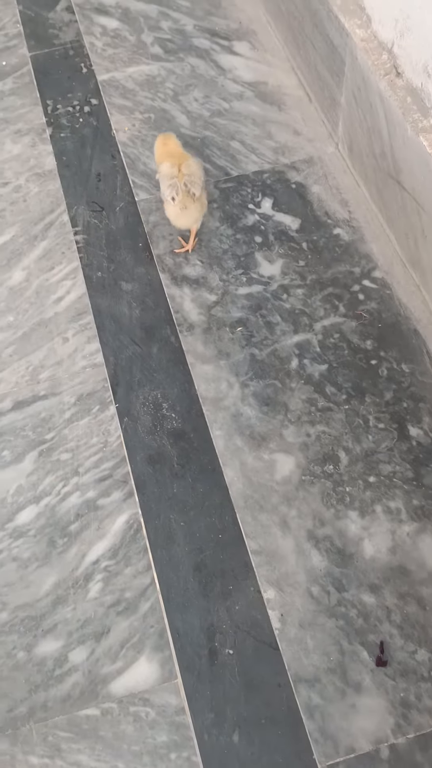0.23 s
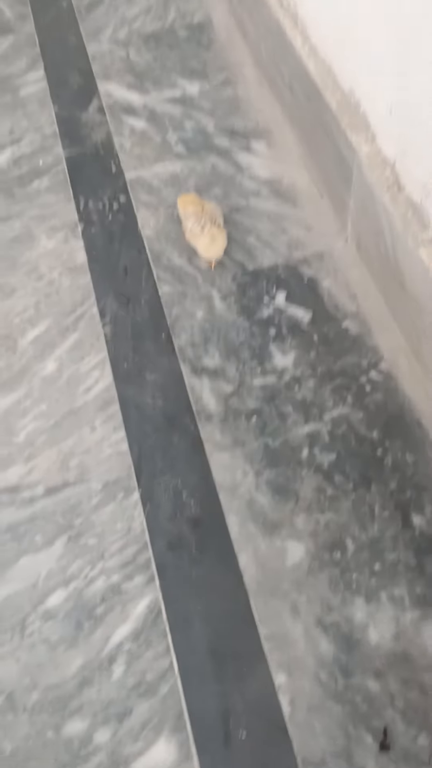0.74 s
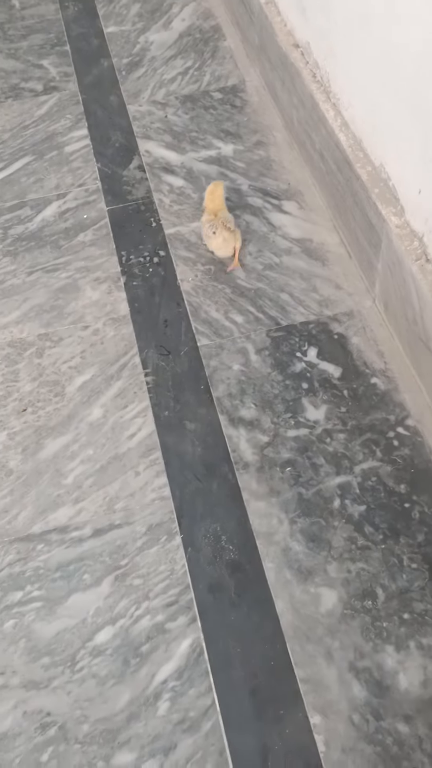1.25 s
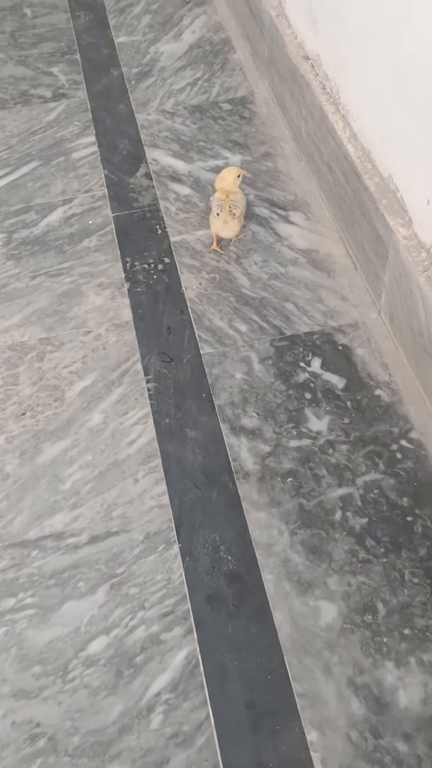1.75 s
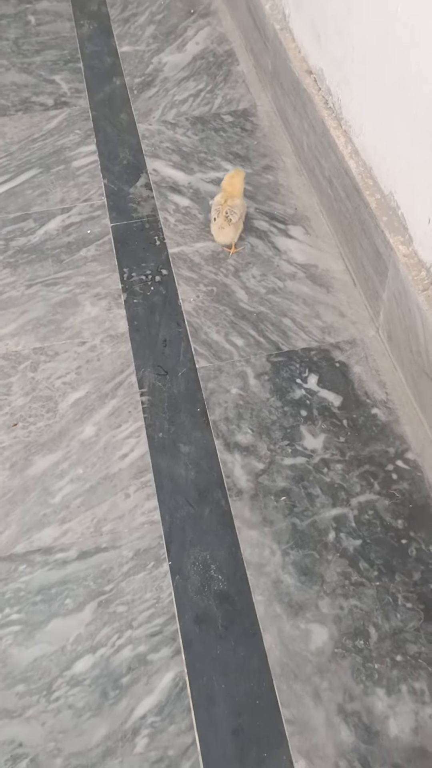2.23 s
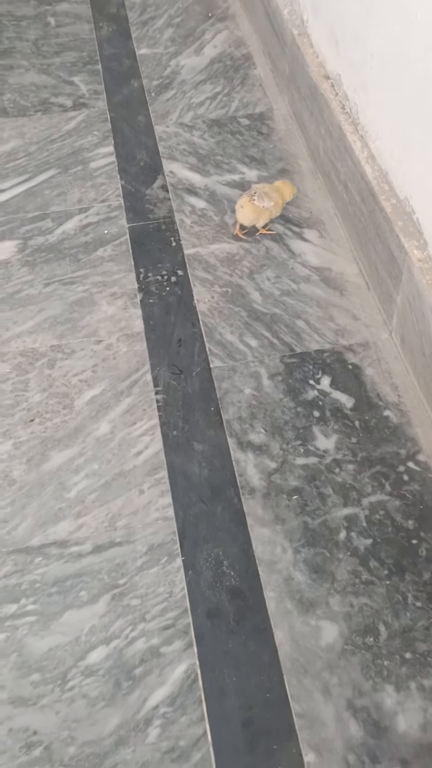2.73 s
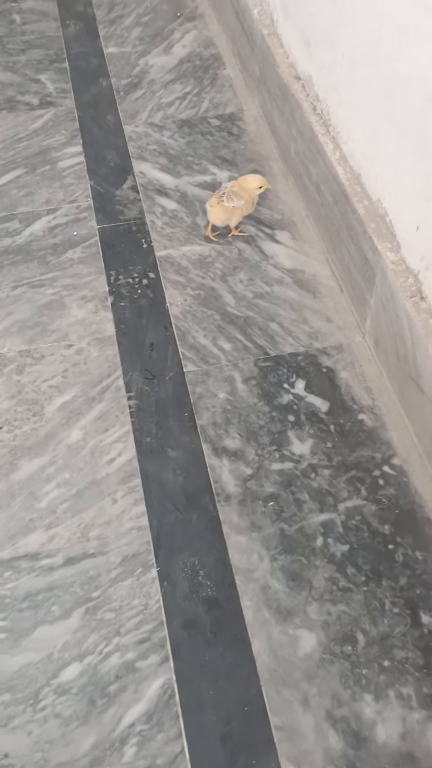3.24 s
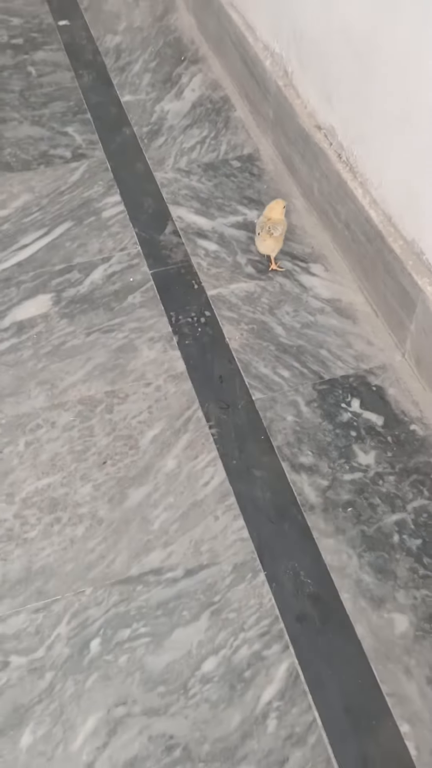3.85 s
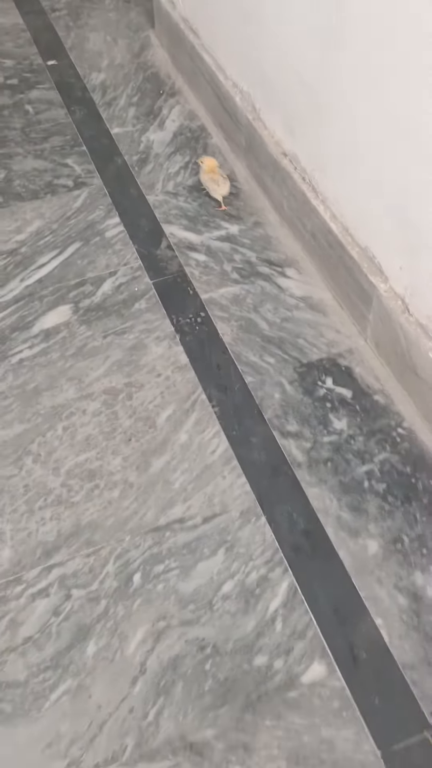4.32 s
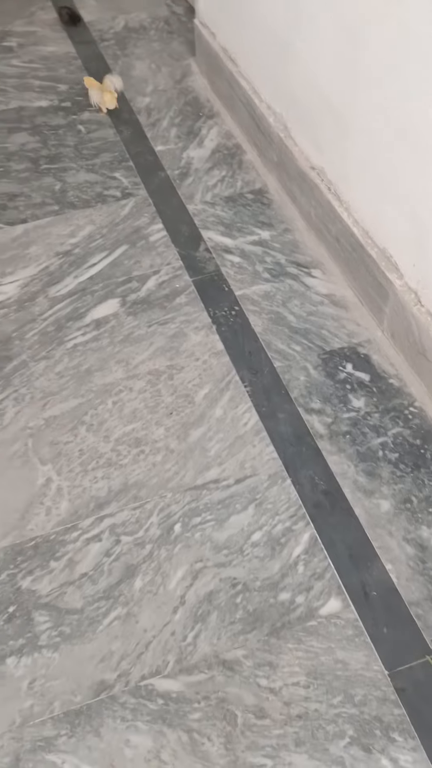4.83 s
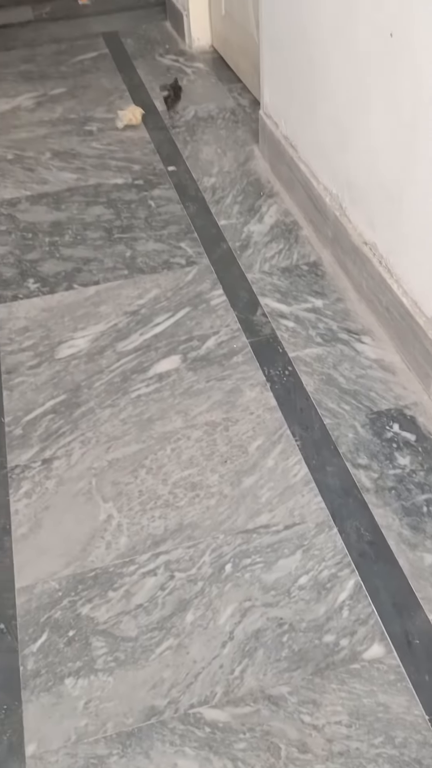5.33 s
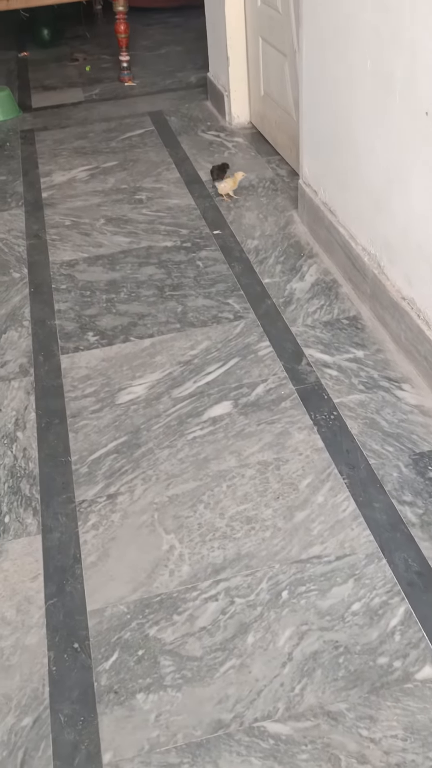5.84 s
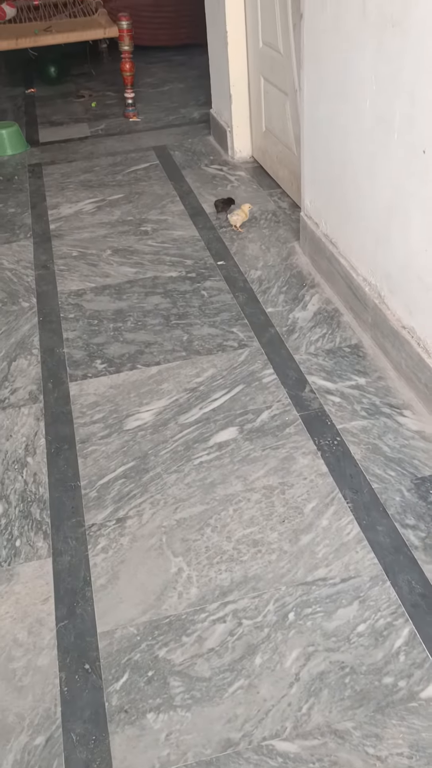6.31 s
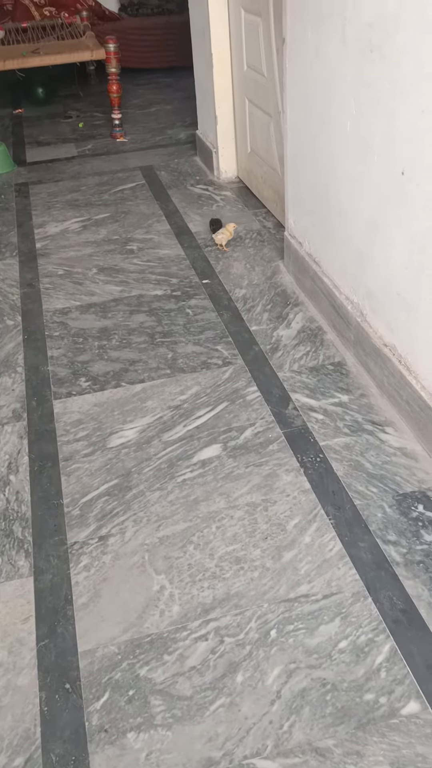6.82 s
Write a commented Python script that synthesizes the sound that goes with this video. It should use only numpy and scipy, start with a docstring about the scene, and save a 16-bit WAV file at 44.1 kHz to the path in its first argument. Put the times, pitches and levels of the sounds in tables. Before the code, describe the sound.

In a bare marble corridor, a chick gives tiny, faint, gliding whistle-like peeps, clustered around the middle. A follower's loose sandals clap sharply near the start, again before three seconds, then more softly, with gritty crunches, scuffs and dull thumps. Two light taps follow. A handheld phone adds low rumble, and the hard walls ring for about a second.

```python
"""A chick peeps softly as it runs down a marble corridor, followed by someone holding a phone.
Each peep is a gliding, trembling whistle. Loose sandals crunch on grit, clap flat and pop the air under them.
Soles and clothes rub as runs of tiny slips; heels and the hand on the phone give dull, low thumps.
The bare walls ring for about a second, over a low, steady background and the rumble of the carried phone."""
import sys
import numpy as np
from scipy import signal
from scipy.fft import rfft, irfft, next_fast_len
from scipy.io import wavfile
from scipy.ndimage import uniform_filter1d, map_coordinates

SR = 44100
rng = np.random.default_rng(int(sys.argv[2]) if len(sys.argv) > 2 else 0)


def digitize_waveform(pressure):
    """Quantize a signal to 16-bit integers and store it at the path in sys.argv[1].

    Rows of a 2-D input are taken as channels; values are limited to [-1, 1].
    """
    field = np.atleast_2d(pressure).T
    bounded = np.clip(field, -1, 1)
    quanta = np.round(bounded * 32767).astype(np.int16)
    wavfile.write(sys.argv[1], SR, quanta)


N = 312095
T = np.arange(N) / SR  # time of every sample in seconds

# Colour of the steady background. Each row: frequency in Hz, relative level in dB per Hz.
BACKGROUND_COLOUR = [(20, -4), (42, -3.5), (90, -4.5), (140, -4), (230, -10), (320, -10), (470, -16),
                     (750, -20), (1050, -23.5), (2400, -28), (3500, -31), (4800, -42), (6500, -40.5),
                     (10000, -47), (15500, -47.5)]
# Swells of the carried phone's rumble. Each row: time in seconds, level in dB before the overall rumble gain.
RUMBLE_LEVELS = [(0.0, -52.5), (0.79, -60.5), (1.06, -52), (1.48, -57), (1.93, -53.5), (3.01, -50),
                 (4.06, -56), (4.39, -47.5), (4.89, -61), (5.58, -62), (6.07, -52.5), (7.08, -66.5)]
# Colour of that rumble. Each row: frequency in Hz, relative level in dB per Hz.
RUMBLE_COLOUR = [(20, -29), (45, -0.5), (60, 1.5), (80, 1.5), (110, -19.5), (250, -20), (600, -62),
                 (2000, -87)]
# How alike the noise is at the two ports. Each row: frequency in Hz, correlation from -1 to 1.
PORT_LIKENESS = [(60, 0.98), (130, 0.95), (290, 0.82), (640, 0.4), (1300, -0.17), (2500, -0.056),
                 (5000, -0.0038)]
# How long the corridor rings. Each row: frequency in Hz, time to fall by 60 dB in seconds.
CORRIDOR_T60 = [(150, 0.99), (600, 0.89), (2000, 0.71), (3600, 0.66), (7500, 0.59), (15000, 0.23)]

# Scuffs of soles and clothes. Each row: time of the peak in seconds, rise from half height to the peak
# in seconds, decay in seconds, level in dB, ring in Hz.
SCUFFS = [(.733, 0.011, .011, -56.5, 6700), (1.18, .026, 0.032, -40.5, 2500), (1.75, .19, 0.17, -69, 7100),
          (2.115, 0.01, 0.052, -56.5, 6130), (2.369, 0.016, 0.0056, -58, 6240),
          (2.90, 0.022, .024, -52, 2900), (3.209, .015, 0.036, -57.5, 4600),
          (3.561, 0.027, 0.05, -56, 7500), (3.796, .025, 0.054, -64, 12100),
          (3.935, .02, 0.05, -53.5, 6660), (4.185, 0.0016, 0.0025, -48.5, 5370),
          (4.425, .043, 0.073, -53, 2010), (4.771, 0.0021, .0066, -57, 7440),
          (4.816, 0.0047, 0.032, -39, 1810), (5.15, 0.04, .023, -53.5, 1870),
          (5.342, 0.0024, 0.059, -52, 7300), (5.395, 0.026, 0.031, -53, 3380), (6.62, .13, 0.14, -71, 3100)]
# Colour of rubbing. Each row: frequency in Hz, relative level in dB per Hz.
SCUFF_COLOUR = [(200, 2.5), (600, 1.5), (1300, -7), (1900, -5), (2700, 1), (3900, 0.5), (5000, -12),
                (6200, -4.5), (7100, -4), (8800, -12), (11500, -16), (15000, -9)]
# A scuff with this ring has this tilt per octave; an octave higher it tilts up by BRIGHTEN_DB more.
SCUFF_HZ, SCUFF_TILT_DB, BRIGHTEN_DB = 2200, 1, 0.4
SCUFF_PAN_DB = -8.5  # every pan is left minus right
SLIDE_RISE_SHARE, SLIDE_HZ = 0.14, 5450  # the sole slides on: rise time over decay time, and its ring
# The walk, and the time in which the clothes start or stop moving.
WALK_STARTS_S, WALK_ENDS_S, SETTLE_S = 0.68, 5.43, 0.35

# Peeps of the chick. Each row: start in seconds, length in seconds, pitch in the middle in Hz, glide from
# start to end in Hz, arch of the middle over the ends in Hz, level in dB, overtone against the main tone in dB.
PEEPS = [(.795, 0.013, 3050, 600, 0, -58.5, -22), (1.948, 0.061, 3054, 458, -230, -60, -25),
         (2.611, 0.02, 2670, -30, -50, -56.5, -32), (2.643, 0.017, 3270, 890, 45, -57.5, -28),
         (3.348, 0.031, 3310, -560, 28, -51.5, -21), (3.704, 0.022, 3250, -320, 105, -53.5, -23),
         (3.737, 0.024, 3280, 743, -130, -51.5, -21), (3.991, 0.031, 3400, -950, 0, -49.5, -30),
         (4.091, 0.033, 3504, -1000, -67, -48, -24), (4.214, 0.0298, 3290, -900, -54, -47, -22),
         (5.052, 0.02, 3600, -150, 700, -43.5, -24), (6.61, .03, 2960, 0, 30, -70, -20),
         (6.966, 0.045, 3106, -66, 70, -56, -17.5)]
TREMBLE = 0.014  # typical wobble as a share of the pitch
FLUTTER_S, FLUTTER_DB = 0.029, -9  # round trip between facing walls, and the loss on each

# Dull thumps of heels and of the hand on the phone. Each row: start in seconds, level in dB, pitch in Hz,
# time to swell and then to decay in seconds.
BUMPS = [(1.01, -29.5, 212, 0.0031), (3.424, -38, 330, 0.0063), (3.701, -40.5, 209.6, 0.02),
         (3.828, -38, 209, 0.021)]

# Steps of the sandals. Each row: time of the clap in seconds, level in dB, lead of the heel in seconds,
# roll-in in seconds, ring in Hz, pitch of the pop in Hz, boost or cut of the midrange around 1500 Hz in dB,
# left minus right in dB, slide decay in seconds, slide level in dB.
STEPS = [(1.0225, -18.5, .0118, 0.0024, 2700, 576, -6, -6.5, 0.0059, -29),
         (2.7205, -20, 0.029, 0.00022, 2840, 610, 0.5, -6.5, 0.048, -41.5),
         (3.429, -26, .0222, 0.0025, 2220, 357, -4.5, -0.5, 0.011, -40)]
# Light taps. Each row: time in seconds, level in dB, roll-in in seconds, tilt in dB per octave, ring in Hz,
# left minus right in dB.
TAPS = [(3.851, -33, 0.0028, -2.5, 830, -6.5), (4.808, -38, 0.0014, 5, 1850, 8)]
# What sole and floor ring with or swallow. Each row: frequency in Hz, width in Hz, boost or cut in dB.
SOLE_MODES = [(479, 6.4, -8), (610, 75, 6.5), (801, 45, 4), (988, 100, 7), (2290, 56, -6)]
# Colour of a slap. Each row: frequency in Hz, relative level in dB per Hz.
SLAP_COLOUR = [(40, -5), (100, -4.5), (220, 2), (330, -6), (560, -1), (900, -6), (1500, -3.5),
               (2800, -10.5), (3950, -10), (4900, -27.5), (6800, -17.5), (9000, -25), (12000, -32),
               (15000, -28)]
# The heel touches first, with a short gritty crunch and only a weak pulse (a flat clap has 1).
HEEL_DB, HEEL_PULSE, HEEL_ROLL_S, HEEL_DECAY_S = -8, 0.51, 0.00094, 0.008
HEEL_TILT_DB, HEEL_HZ, HEEL_MID_DB, HEEL_PAN_DB = -0.5, 2280, -4, -11.5
# The sole claps flat, and the air under it pops a moment later. Tilts are per octave.
CLAP_DECAY_S, CLAP_TILT_DB = 0.0027, -0.08
POP_LAG_S, POP_DB, POP_ROLL_S, POP_DECAY_S, POP_TILT_DB, POP_PAN_DB = 0.0026, -9, 0.0015, 0.0045, -0.7, -6.5
TAP_DECAY_S, TAP_MID_DB = 0.0053, 2


def undb(db):
    """Turn decibels into a gain."""
    return 10 ** (np.asarray(db) / 20)


def unit(x):
    """Scale to an average (rms) strength of 1."""
    return x / np.sqrt(np.mean(x ** 2))


def along(points, hz):
    """Read a table of frequency and value, in straight lines over log frequency."""
    f, value = np.transpose(points)
    return np.interp(np.log(np.maximum(hz, 1)), np.log(f), value)


def bins(size):
    """List the frequencies in the spectrum of a sound of this many samples."""
    return np.arange(size // 2 + 1) * SR / size


def wander(rate):
    """Drift at random in straight lines between this many points a second, with rms 1."""
    knots = rng.standard_normal(8192)
    return unit(map_coordinates(knots, [T * rate], order=1, mode="wrap"))


def diffuse(size):
    """Make spectra of noise arriving from all sides, partly alike at the two ports."""
    alike = np.clip(along(PORT_LIKENESS, bins(size)), -1, 1)
    mid, side = rfft(rng.standard_normal((2, size)))
    shared = mid * np.sqrt((1 + alike) / 2)
    opposed = side * np.sqrt((1 - alike) / 2)
    return shared + opposed * np.array([[1], [-1]])


def wash(colour):
    """Make noise from all sides with the given colour and rms 1."""
    size = next_fast_len(N, True)
    spectra = diffuse(size) * undb(along(colour, bins(size)))
    return unit(irfft(spectra, size)[:, :N])


def ring(colour, tilt_db, modes=(), size=4096):
    """Answer a knock with a tilted colour and resonances, never before the knock; total energy is 1."""
    hz = bins(size)
    db = along(colour, hz) + tilt_db * np.log2(np.clip(hz, 250, None) / 1000)
    for centre, width, peak in modes:
        db = db + peak / (1 + (2 * (hz - centre) / width) ** 2)
    # folding the cepstrum forward in time puts the energy as early as this colour allows
    cepstrum = irfft(np.log(undb(db)))
    cepstrum[1:size // 2] *= 2
    cepstrum[size // 2 + 1:] = 0
    response = irfft(np.exp(rfft(cepstrum)))
    return response / np.linalg.norm(response)


def add(track, s, sound):
    """Mix a sound into a track at time s."""
    start = max(int(s * SR), 0)
    part = sound[..., :max(N - start, 0)]
    track[..., start:start + part.shape[-1]] += part


def add_placed(track, s, sound, pan_db, lag_s):
    """Mix into rows left, right and room; the left port hears it a little later."""
    add(track[0], s + lag_s, sound * undb(pan_db / 2))
    add(track[1], s, sound * undb(-pan_db / 2))
    add(track[2], s, sound)


def background(air_db=-52, sway_db=-0.65, rumble_db=1, pan_db=-0.46):
    """The steady murk of the house, and the rumble of the phone being carried."""
    air = wash(BACKGROUND_COLOUR) * undb(air_db + sway_db * wander(rate=3.92))
    rumble = wash(RUMBLE_COLOUR) * undb(rumble_db + np.interp(T, *np.transpose(RUMBLE_LEVELS)))
    return (air + rumble) * undb(np.array([[pan_db], [-pan_db]]) / 2)


def rustle(rustle_db=-73.0, resting_db=-10, sway_db=4.0, tilt_db=1.2, pan_db=-5, lag_s=0.00039):
    """Clothes brush faintly all through the walk, and hardly at all before and after."""
    track = np.zeros((3, N))
    brush = signal.fftconvolve(rng.standard_normal(N), ring(SCUFF_COLOUR, tilt_db))[:N]
    resting = np.clip(np.maximum(WALK_STARTS_S - T, T - WALK_ENDS_S) / SETTLE_S, 0, 1)
    level_db = rustle_db + resting_db * resting + sway_db * wander(rate=11)
    add_placed(track, 0, brush * undb(level_db), pan_db, lag_s)
    return track


def rubs():
    """Each clap starts a slide, scuffs have times of their own, and a rub that rings higher is brighter."""
    slides = []
    for s, *_, decay, db in STEPS:
        rise = SLIDE_RISE_SHARE * decay
        slides.append((s + 2 * rise, rise, decay, db, SLIDE_HZ))
    for s, rise, decay, db, ring_hz in slides + list(SCUFFS):
        tilt_db = SCUFF_TILT_DB + BRIGHTEN_DB * np.log2(ring_hz / SCUFF_HZ)
        yield s, rise, decay, db, tilt_db, ring_hz, SCUFF_PAN_DB


def scuffs(grain_db=0.5, ring_db=6, ring_share=0.27, lag_s=0.00043, size=32768):
    """Rubbing swells and dies away: a dense run of tiny slips of uneven size."""
    track, t = np.zeros((3, N)), T[:size]
    for s, rise, decay, db, tilt_db, ring_hz, pan_db in rubs():
        noise, sizes = rng.standard_normal((2, size))
        unevenness = unit(uniform_filter1d(sizes, size=40))
        slips = unit(noise * undb(grain_db * unevenness))
        since = t - 2 * rise  # the swell passes half height one rise time before its peak
        swell = (1 - np.cos(np.pi / 2 * t / rise)) / 2
        pressure = np.where(since < 0, swell, np.exp(-np.abs(since) / decay))
        body = ring(SCUFF_COLOUR, tilt_db, [(ring_hz, ring_share * ring_hz, ring_db)])
        rub = signal.fftconvolve(slips * pressure, body)
        add_placed(track, s - 2 * rise, undb(db) * rub, pan_db, lag_s)
    return track


def chick(pan_db=-1, lag_s=0.0001):
    """The syrinx (the bird's voice organ) whistles a nearly pure, trembling tone that glides and arches."""
    track, tremble = np.zeros((3, N)), wander(rate=630)
    for s, length, middle_hz, glide_hz, arch_hz, db, overtone_db in PEEPS:
        u = np.linspace(0, 1, int(length * SR))  # 0 at the start of the peep, 1 at its end
        hz = middle_hz + glide_hz * (u - 0.5) - arch_hz * (2 * u - 1) ** 2
        wobble = 1 + TREMBLE * np.roll(tremble, -int(s * SR))[:len(u)]
        phase = 2 * np.pi * np.cumsum(hz * wobble) / SR
        tone = np.sin(phase) + undb(overtone_db) * np.sin(2 * phase)
        peep = tone * np.sqrt(np.abs(np.sin(np.pi * u)))
        add_placed(track, s, undb(db) * unit(peep), pan_db, lag_s)
    return track


def fluttering(track, count=4):
    """A peep bounces between facing walls and returns several times, weaker on each trip."""
    out = track.copy()
    for trip in range(1, count + 1):
        add(out[:2], trip * FLUTTER_S, undb(trip * FLUTTER_DB) * track[:2])
    return out


def bumps(size=16384):
    """A soft, heavy push swells and fades in one low resonance."""
    track, t = np.zeros(N), T[:size]
    for s, db, hz, decay in BUMPS:
        swell = (t / decay) * np.exp(-t / decay)
        add(track, s, undb(db) * 2 * swell * np.sin(2 * np.pi * hz * t))
    return track


def contacts():
    """A step meets the stone as heel, clap and pop of air; a tap is one light touch."""
    for s, db, lead, roll_in, ring_hz, pop_hz, mid_db, pan_db, _, _ in STEPS:
        yield (s - lead, db + HEEL_DB, HEEL_PULSE, HEEL_ROLL_S, HEEL_DECAY_S,
               HEEL_TILT_DB, HEEL_HZ, HEEL_MID_DB, HEEL_PAN_DB)
        yield s, db, 1, roll_in, CLAP_DECAY_S, CLAP_TILT_DB, ring_hz, mid_db, pan_db
        yield (s + POP_LAG_S, db + POP_DB, 1, POP_ROLL_S, POP_DECAY_S,
               POP_TILT_DB, pop_hz, mid_db, POP_PAN_DB)
    for s, db, roll_in, tilt_db, ring_hz, pan_db in TAPS:
        yield s, db, 1, roll_in, TAP_DECAY_S, tilt_db, ring_hz, TAP_MID_DB, pan_db


def slaps(crunch=0.29, grit_hz=900, grit_lows=0.31, ring_db=6, ring_share=0.1,
          mid_hz=1500, mid_width_hz=900, lag_s=0.00043, size=4096):
    """Grit crunches louder as a sole rolls onto the stone, it claps flat in one pulse, and the crunch dies away."""
    track, t = np.zeros((3, N)), T[:size] - T[size // 2]  # the pulse falls at t = 0
    thin = signal.butter(1, grit_hz, "high", fs=SR, output="sos")
    for s, db, pulse, roll_in, decay, tilt_db, ring_hz, mid_db, pan_db in contacts():
        noise = rng.standard_normal(size)
        # small grains carry little bass
        grit = grit_lows * noise + (1 - grit_lows) * signal.sosfilt(thin, noise)
        push = crunch * grit * np.exp(-np.abs(t) / np.where(t < 0, roll_in, decay))
        push[size // 2] += pulse
        modes = list(SOLE_MODES) + [(ring_hz, ring_share * ring_hz, ring_db), (mid_hz, mid_width_hz, mid_db)]
        clap = signal.fftconvolve(push, ring(SLAP_COLOUR, tilt_db, modes))
        add_placed(track, s + t[0], 10 * undb(db) * clap / np.linalg.norm(clap), pan_db, lag_s)
    return track


def shaded(track, corner_hz=7000, shade_db=-7, facing_db=2.0):
    """The body of the phone hides the left port from the treble of the feet; the right port faces them."""
    treble = signal.sosfilt(signal.butter(1, corner_hz, "high", fs=SR, output="sos"), track)
    return track + treble * (undb([[shade_db], [facing_db], [0]]) - 1)


def corridor(early, early_s=0.015, build_s=0.0053, size=65536):
    """Echoes of the stone corridor: the near walls answer first and strongest, and the treble dies soonest."""
    t, hz, noise = np.arange(size) / SR, bins(size), diffuse(size)
    centres, t60s = np.transpose(CORRIDOR_T60)
    tail = 0
    # each row of the identity matrix picks out one frequency band
    for share, t60 in zip(np.eye(len(centres)), t60s):
        band = irfft(noise * along(np.column_stack([centres, share]), hz))
        tail = tail + band * np.exp(-np.log(1000) * t / t60)
    build_up = 1 - np.exp(-(t / build_s) ** 2)
    tail = tail * build_up * (1 + early * np.exp(-t / early_s))
    return unit(tail) / np.sqrt(size)


def heard(track, echoes, wet_db):
    """Add the echoes of the room row to the direct sound."""
    return track[:2] + undb(wet_db) * signal.fftconvolve(track[2:], echoes, axes=1)[:, :N]


def scene():
    """Chick and feet sound from different places in the corridor, each with its own echoes."""
    rubbing = heard(shaded(scuffs() + rustle()), corridor(early=0.99), wet_db=-2.5)
    bird = heard(fluttering(chick()), corridor(early=0.49), wet_db=-2)
    steps = heard(shaded(slaps()), corridor(early=1.0), wet_db=-3)
    return background() + rubbing + bird + bumps() + steps


def record(dry):
    """The phone cuts the top of the treble, above 15650 Hz."""
    return signal.sosfilt(signal.ellip(10, 0.2, 70, 15650, fs=SR, output="sos"), dry)


dry = scene()
out = record(dry)
digitize_waveform(out)
```